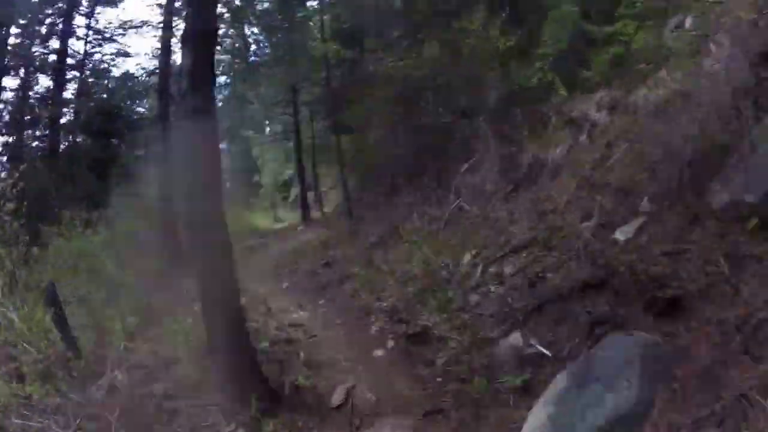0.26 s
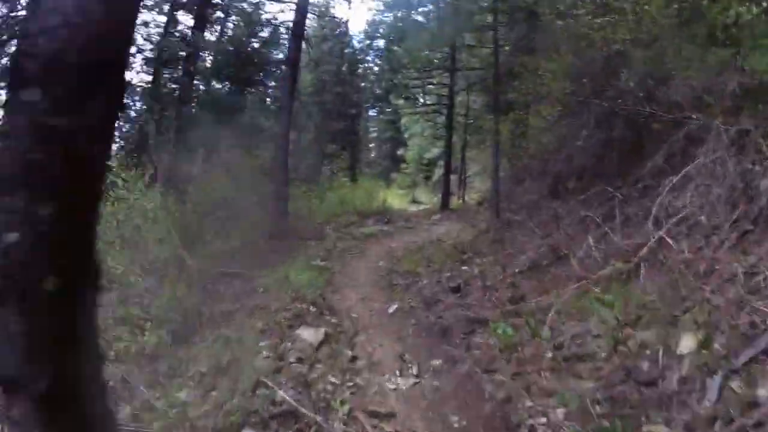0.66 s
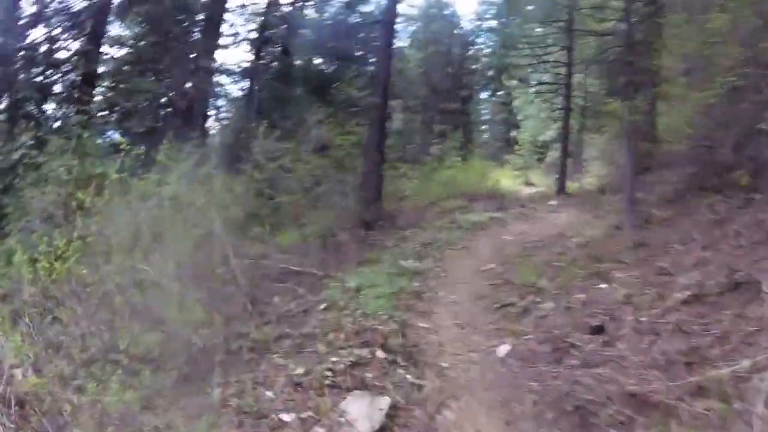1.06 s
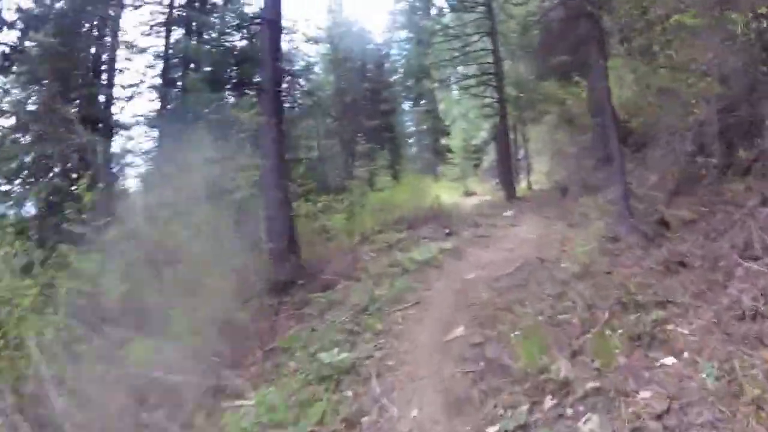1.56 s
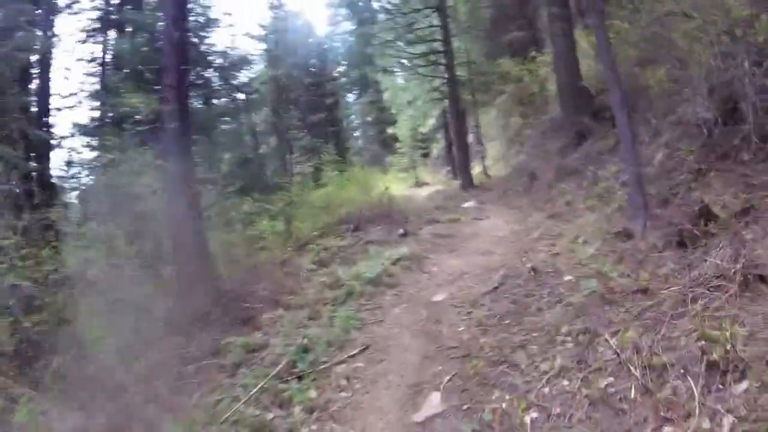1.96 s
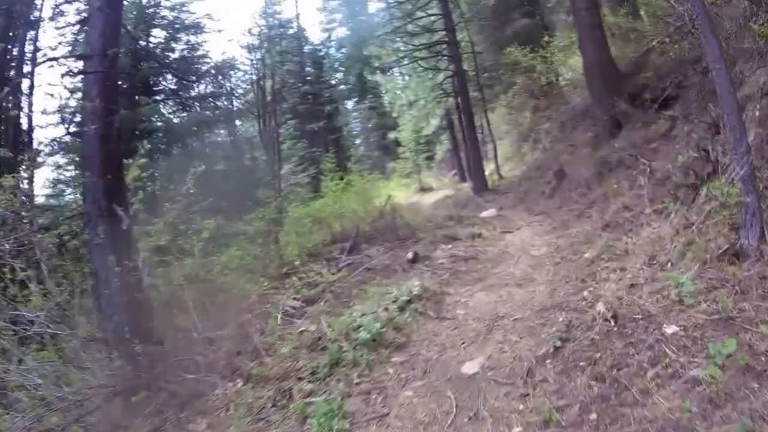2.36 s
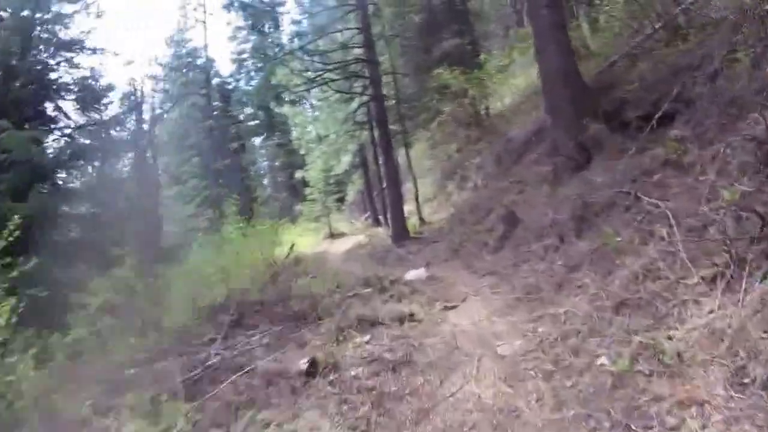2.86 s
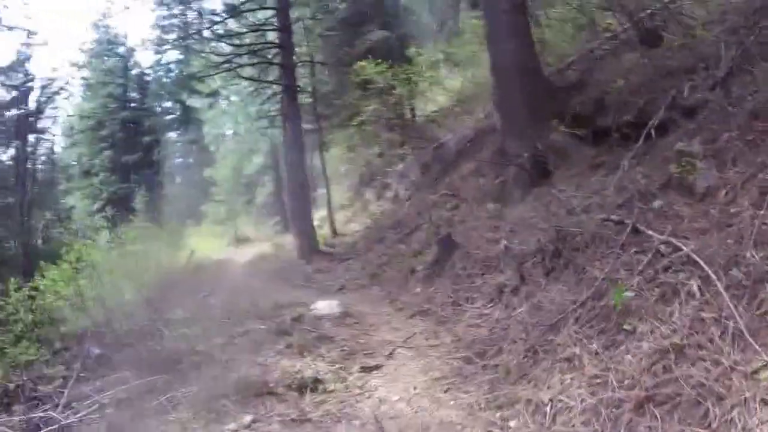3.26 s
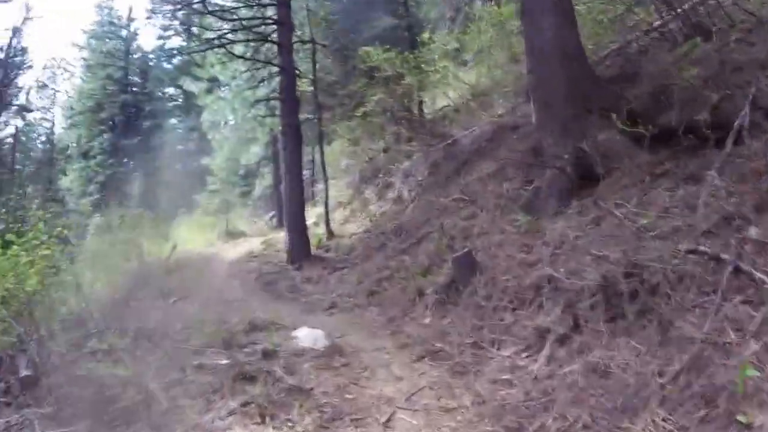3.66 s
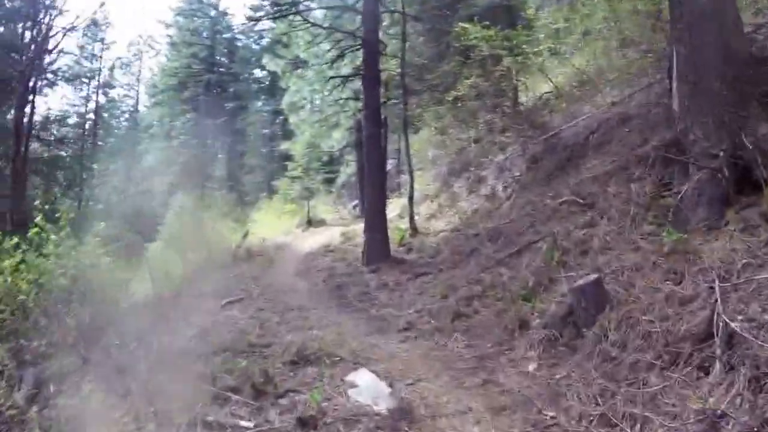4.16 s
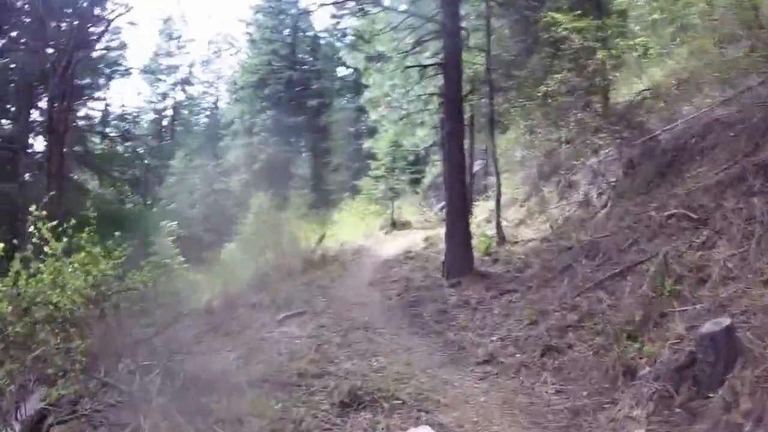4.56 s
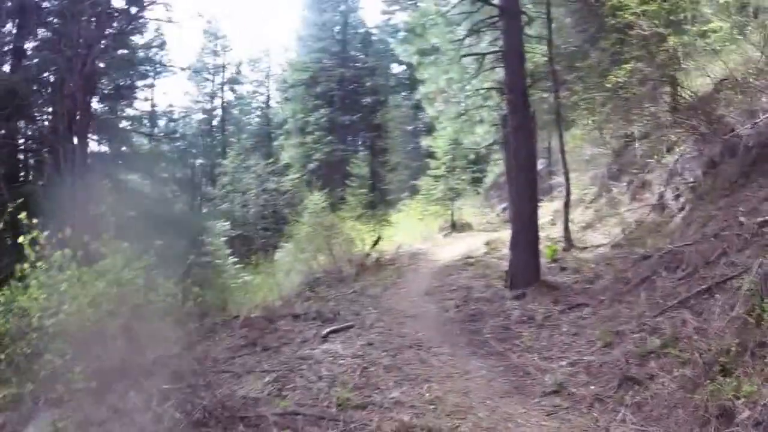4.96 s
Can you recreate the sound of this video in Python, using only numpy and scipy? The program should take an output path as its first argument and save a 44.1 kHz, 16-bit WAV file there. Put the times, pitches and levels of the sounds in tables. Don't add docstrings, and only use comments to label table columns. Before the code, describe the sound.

Boxy knocks, bright plastic rattles and gritty tyre chatter crowd together as a bike bounces fast downhill over rocks, roots and loose dirt.

```python
import sys
import numpy as np
from scipy import signal
from scipy.io import wavfile
from scipy.ndimage import uniform_filter1d

SR = 44100
rng = np.random.default_rng(int(sys.argv[2]) if len(sys.argv) > 2 else 0)


def generate_wav(sig):
    pcm = np.round(np.clip(np.atleast_2d(sig).T, -1, 1) * 32767).astype(np.int16)
    wavfile.write(sys.argv[1], SR, pcm)


def rack_gain(trim_db):
    fader = np.asarray(trim_db, float)
    return 10 ** (fader / 20)


N = 229653

# (frequency [Hz], width [Hz], level [dB])
HOLLOW_MODES = [(260, 59, -7), (358.4, 62, 0.5), (482.5, 54.8, 2), (604, 78, -7), (800, 66, -10)]
# (frequency [Hz], width [Hz], level [dB])
LID_MODES = [(642, 49, 0.12), (800, 152, -1.1)]
# (frequency [Hz], width [Hz], level [dB])
LOWER_WALL_MODES = [(834, 640, -7), (985, 540, 1), (1264, 122, 10), (1598, 153, 6)]
# (frequency [Hz], width [Hz], level [dB])
UPPER_WALL_MODES = [(2247, 135, 8.5), (2725, 111, 11), (3458, 224, 4), (4130, 270, -9.5)]
# (frequency [Hz], width [Hz], level [dB])
FRAME_MODES = [(83.5, 24, 0.5), (132.4, 21, -0.5), (196, 101, -11)]
# (frequency [Hz], width [Hz], level [dB])
VENT_MODES = [(3800, 360, 4), (4400, 280, 4.5), (4960, 310, -9), (5760, 350, -6), (6600, 500, -18.5),
              (7100, 400, -21), (9250, 500, -36)]

# (time [s], shake level [dB], stoniness [dB])
TRAIL = [(0.0, -15, -7), (0.09, -22.5, -8), (0.261, -22.5, -3.5), (0.93, -17.5, -2.5), (1.32, -18.5, -2.5),
         (1.87, -14.5, -6), (2.49, -19, -5.5), (2.69, -18.5, 0.5), (2.78, -18.5, -3), (3.481, -20.5, -3),
         (3.9, -18.5, 0), (4.2, -17.5, -1.5), (4.53, -17.5, -2), (5.2, -15.5, -2)]
# (middle [s], chatter change [dB], half length [s])
SKIDS = [(0.072, 10, 0.011), (0.169, -26, 0.023), (0.423, 9, 0.029), (0.618, 8, 0.025), (0.956, 7, 0.01),
         (1.027, 13, 0.037), (1.11, -6, 0.0047), (1.237, 5, 0.009), (1.607, -9, 0.013), (1.728, 6, 0.048),
         (1.915, -5, 0.036), (2.025, 8.5, 0.018), (2.372, 12.5, 0.041), (2.421, -14, 0.01),
         (2.656, 4.5, 0.011), (3.064, 4.5, 0.034), (3.104, 4, 0.15), (3.156, -13, 0.017), (3.22, 3, .015),
         (3.456, 8, 0.1), (3.49, 4, 0.023), (3.593, 9.5, 0.033), (3.809, -9, 0.032), (4.229, 9.5, 0.0093),
         (4.35, -5, 0.0089), (4.455, 6.5, 0.0042), (4.6, 4.5, 0.049), (4.712, -1, 0.02),
         (4.883, -10, 0.0058), (5.124, 7.5, 0.0072)]
# (time [s], peak level [dB], pitch [Hz])
JOLTS = [(0.03, -4, 382), (0.208, -5, 350), (0.226, -5.5, 426), (0.237, -8.5, 490), (0.72, 3, 421),
         (0.823, 3, 456), (0.95, -4, 340), (0.962, -5, 470), (1.368, 5, 408), (1.377, -1, 435),
         (1.695, -2, 355), (1.729, 3, 427), (1.749, -15, 470), (2.197, 2.5, 464), (2.349, -4, 576),
         (5.143, -3, 470), (2.587, 5, 408), (2.669, -5, 430), (2.775, -2, 494), (2.811, -2.5, 436),
         (5.191, 1.5, 447), (3.06, -5, 476), (3.312, -10, 380), (5.164, 2.5, 468), (3.841, -6, 503),
         (4.075, -4, 440), (4.258, -8, 440), (4.766, -3.5, 485), (4.895, -4, 506), (4.937, 1, 510),
         (0.0005, 0.5, 387)]
# (time [s], knock level [dB], rattle level [dB], pitch [Hz])
ROOTS = [(0.0065, -8.5, -27, 393), (0.083, -5.5, -19.5, 370), (0.227, -13, -30, 470), (0.441, -4, -15, 430),
         (0.554, -8, -34, 372), (0.629, -6, -21, 470), (1.132, 1, -12, 538), (1.283, -3.5, -13.5, 357),
         (1.321, 0.5, -16, 368), (1.455, -5.5, -19, 386), (2.048, -5, -9, 427), (2.125, -6, -18, 490),
         (2.558, -8.5, -29.5, 449), (2.588, -2.5, -16.5, 399), (2.668, -12.5, -28, 386),
         (2.877, -21, -57, 430), (3.089, -1.5, -37, 480), (3.182, -5.5, -24.5, 463),
         (3.566, -3.5, -14, 376), (1.551, -5.5, -28, 476), (4.038, -4.5, -19, 490),
         (4.075, -13.5, -17, 446), (4.323, 0.5, -17, 508), (4.388, -1.5, -16.5, 503),
         (4.432, -2.5, -12, 468), (4.65, -7, -21, 450), (4.726, -7, -15, 462), (5.036, -3.5, -10.5, 453),
         (5.155, 0, -14, 468), (5.184, 0.5, -16.5, 450)]
# (time [s], rattle level [dB], knock level [dB], tick level [dB], ring T60 [s])
ROCKS = [(.0175, -23, -5, -25.5, 0.016), (.306, -7, -16.5, -22.5, 0.015), (.496, -4.5, -5.5, -9, 0.059),
         (.72, -5.5, -9.5, -32, 0.026), (.762, -5.5, -4, -4, 0.06), (0.8179, 1, 0, -8.5, 0.065),
         (1.007, 4, 4.5, -10, 0.019), (1.021, 5.5, -11, -16.5, 0.17), (1.069, 3, -3, -6, 0.02),
         (1.364, -7, -16.5, -7, 0.044), (1.502, -1.5, -4.5, -4, 0.049), (1.566, -5.5, -3, -23, 0.053),
         (1.746, -4, -5.5, -7, 0.05), (1.89, -6.5, 1.5, -9, 0.058), (2.159, -12.5, -1.5, -16.5, 0.032),
         (2.355, 4, -8.5, -13, 0.033), (2.4651, -5.5, 1, -8.5, 0.066), (2.773, -1.5, -5.5, -9.5, 0.072),
         (3.368, 1, -5.5, -10.5, 0.039), (3.588, -3, -7.5, -6.5, 0.056), (3.7112, -2, -0.5, -20.5, 0.064),
         (4.212, -2.5, -5.5, -9, 0.041), (4.79, -10, -1.5, -10, 0.08), (4.897, 6, -26, -13, 0.05)]
# (time [s], rattle level [dB], knock level [dB], tick level [dB])
REBOUNDS = [(0.093, -7, -22, -22), (.314, -13, -12.5, -17), (0.782, -16.5, -14, -10.5),
            (.836, -2, -6, -20.5), (1, -13, -16.5, -9), (1.033, -11, -3, -25), (1.042, -11, -23, -18),
            (1.082, -14, -12, -14), (1.517, -13, -10, -18), (1.541, -11, -8.5, -31),
            (1.721, -4.5, -11, -17), (1.895, 1, 0, -15.5), (1.911, -14, -10, -12), (2.17, -5.5, -9, -37),
            (2.193, -1.5, -6.5, -14.5), (2.34, -4.5, -11, -5.5), (2.37, -13, -15.5, -31),
            (2.478, -4, -7, -13.5), (2.5, -9, -8, -18), (2.527, -4, -5, -13), (2.809, -4, -10, -23),
            (2.834, -4, -10, -13.5), (3.601, 0, -7, -16.5), (3.61, -2, -5, -28.5),
            (3.722, -11, -10.5, -13.5), (4.225, 2, -11, -8), (4.245, -22, -25, -29), (4.906, -26, -7, -28),
            (4.933, -3.5, -31, -17), (4.965, -3, -16, -9.5)]
# (time [s], rattle level [dB], knock level [dB], tick level [dB])
STONES = [(0.064, -15, -18, -23), (0.221, -18, -6, -15), (0.288, -9, -16.5, -17), (0.415, -23, -17, -17.5),
          (0.534, -12, -19, -20), (0.602, -13.5, -35, -20), (0.918, -27, -26, -12), (1.245, -20, -37, -16),
          (1.41, -4.5, -15, -36), (1.473, -17, -13, -11), (1.677, -10, -23, -21), (1.694, -6, -21, -28),
          (1.865, -3, -20, -23), (2.239, -15, -19, -28), (2.282, -16, -19, -12.5), (2.516, -9, -15, -22),
          (2.744, -3.5, -7.5, -9), (2.895, -6.5, -14.5, -9.5), (2.933, -8, -27, -19.5),
          (3.121, -15, -12.5, -22), (3.143, -17, -37, -13.5), (3.25, -9, -10, -13), (3.272, -5, -10, -12),
          (3.689, -1, -8, -11), (3.896, -10.5, -11.5, -16.5), (4.128, -2, -11.5, -13),
          (4.285, -6, -18, -19.5), (4.46, -1, -22, -16), (4.992, -7, -8.5, -10.5), (5.076, -2.5, -6, -13.5)]
# (time [s], rattle level [dB], knock level [dB], tick level [dB])
PEBBLES = [(0.172, -23, -22.5, -33), (0.483, -24, -27, -34), (0.544, -7, -12.5, -20),
           (0.702, -12.5, -15, -27), (1.172, -35, -13.5, -42), (1.334, -8.5, -11.5, -10.5),
           (1.647, -17, -30, -21), (1.803, -26, -25, -20), (1.848, -17, -15, -22), (2.025, -25, -32, -21),
           (2.081, -28, -33, -27), (2.221, -14, -19, -17), (2.413, -25, -24, -21), (2.653, -15.5, -30, -25),
           (2.962, -16, -23, -12.5), (3.097, -11.5, -14, -27), (3.281, -29, -21, -22),
           (3.339, -23, -14.5, -25), (3.503, -25, -16, -18), (3.551, -11.5, -24, -12.5),
           (3.665, -18, -29, -32), (3.746, -11, -19, -18.5), (3.783, -11, -13, -15),
           (3.844, -9.5, -32, -28), (3.872, -11.5, -28, -15.5), (3.945, -15, -14.5, -22),
           (3.986, -28, -13.5, -29), (4.177, -8.5, -14, -20), (4.406, -5.5, -14, -26),
           (4.519, -20, -18, -26)]
# (middle [s], peak level [dB], pitch [Hz], half length [cycles])
THUDS = [(.012, -14.5, 89, 2.3), (0.0886, 5, 190, 0.24), (0.099, 6, 200, 0.3), (0.112, -5.5, 89.3, 2.3),
         (0.125, -10, 90, 0.72), (0.307, 13.5, 204, 0.32), (0.343, 3.5, 111, 0.18),
         (1.022, -22.5, 136, 3.6), (1.336, -9, 90, 0.56), (1.902, -2.5, 260, 0.52), (3.502, -10.5, 129, 2),
         (0.489, -13.5, 82.6, 1.8), (3.99, -19, 77, 3.5), (4.911, -2, 201, 0.21)]
# (time [s], peak level [dB], frequency [Hz])
SNAPS = [(0.055, -30.5, 3920), (0.061, -27, 3780), (0.085, -31, 4020), (0.171, -32, 3880),
         (0.418, -27, 4000), (0.793, -29, 3800), (0.916, -42, 3820), (4.214, -23, 4800), (1.002, -32, 3860),
         (1.084, -23, 3820), (1.231, -31, 3800), (1.243, -25.5, 4270), (1.283, -27.5, 3950),
         (1.335, -28, 4000), (1.568, -26.5, 3800), (1.75, -22, 4130), (1.906, -15.5, 3980),
         (2.044, -23, 3800), (2.152, -27, 3900), (2.172, -33, 4020), (2.467, -19, 3800), (2.516, -23, 3940),
         (3.139, -26, 3930), (3.462, -26, 3820), (3.506, -20.5, 3850), (3.55, -22, 3800),
         (3.592, -20, 4110), (3.725, -26, 3810), (0.4975, -25, 4800), (3.901, -33, 3800),
         (4.244, -22, 3860), (4.461, -28, 5200)]
# (time [s], peak level [dB], panel frequency [Hz])
CHIPS = [(0.101, -14, 1920), (0.528, -6, 2190), (0.624, -9, 2200), (0.656, -12, 2150), (0.807, -22, 2630),
         (0.835, -6, 2380), (1.025, -4, 1970), (1.147, -13, 2140), (1.162, -13, 2720), (1.9125, -2, 3020),
         (1.307, -7.5, 2790), (1.452, -5.5, 2680), (1.494, -22.5, 2710), (4.894, -10, 2240),
         (1.568, -13, 2180), (1.729, -7, 2700), (1.905, 0, 3270), (1.964, -17, 2700), (1.971, -14, 2690),
         (2.121, -16, 2330), (2.133, -12, 2640), (2.159, -2, 2340), (2.328, -14, 2730), (2.358, -3, 1730),
         (2.55, -12, 2650), (2.715, -18, 2730), (2.912, -12, 2730), (5.072, -6, 2580), (3.121, -10, 2310),
         (3.264, -13, 2700), (3.271, -4, 2260), (3.337, -13, 2620), (3.399, -8, 2630), (3.421, -9, 2710),
         (3.566, 0, 2710), (3.589, 3, 2610), (3.634, -24, 2700), (3.794, -11, 2650), (3.841, -9, 2680),
         (3.914, -12, 2690), (3.953, -13, 2060), (4.026, -7, 1810), (4.049, -11, 1810), (4.151, -16, 2710),
         (4.257, -6, 2740), (4.321, -9, 2660), (4.332, -19, 2660), (4.343, -14, 2700), (4.379, -11.5, 2730),
         (1.7505, 1, 3200), (4.531, -5, 2610), (4.59, -8, 1850), (4.618, -14, 2750), (4.633, -10.5, 2320),
         (4.692, -22, 2720), (4.765, -10, 2620), (4.783, -20, 1810), (5.021, -13, 2310), (5.116, -8, 2300),
         (5.183, -13, 2800)]
# (time [s], peak level [dB], panel frequency [Hz])
GRAVEL = [(0.22, -12, 1420), (0.291, -7, 1250), (0.36, -18, 1090), (0.414, -21, 1330), (0.53, -6.5, 1500),
          (0.608, -12, 1550), (0.661, -12, 800), (0.992, -7, 1600), (1.081, -2, 664), (1.174, -10.5, 654),
          (1.452, -6, 700), (1.473, -16, 636), (1.517, -2, 1250), (1.622, -16.5, 1360), (1.745, -1, 640),
          (1.833, -19, 1330), (1.91, -11, 635), (1.965, -8, 740), (1.984, -9, 670), (2.16, 1, 1240),
          (2.222, -15, 1660), (2.244, -9.5, 1360), (2.284, -5.5, 1240), (2.348, 1, 660), (2.377, -6, 1330),
          (2.397, -22, 1310), (2.413, -7, 760), (2.458, -11, 1340), (2.499, -8, 1310), (2.547, -16, 1260),
          (2.587, -4.5, 743), (2.746, 1, 1280), (2.967, -5.5, 1550), (3.045, -28, 660), (3.064, -15, 1300),
          (3.086, -10.5, 910), (3.132, -7.5, 1250), (3.143, -11, 1680), (3.178, -7.5, 854),
          (3.25, -2, 1545), (3.285, -27, 654), (3.37, 2.5, 1254), (3.401, -10, 1300), (3.415, -22, 1320),
          (3.592, 5, 800), (3.635, -7, 654), (4.001, -14.5, 670), (4.018, -14, 820), (4.03, -10.5, 640),
          (4.05, -10, 1320), (4.213, 2.5, 1540), (4.259, -9.5, 1520), (4.552, -9.5, 1465),
          (4.587, -16, 820), (4.698, -11.5, 1340), (4.767, -7, 1520), (4.783, -10.5, 1260),
          (5.022, -8.5, 1260), (5.066, -7, 800), (5.099, -1.5, 790)]

LANDING_SAG_HZ = 111
KNOCK_HZ, SETTLE_S, KNOCK_SPREAD = 457, 0.81, 0.017
ROCK_HZ, ROCK_SETTLE_S, ROCK_SPREAD = 468, 0.3, 0.018
KNOCK_T60_S, T60_SPREAD, REBOUND_T60_SHARE = 0.038, 0.3, 0.89
KNOCK_LAG_S = 0.00154
COLOUR_HZ, COLOUR_OCT_PER_DB, COLOUR_SPREAD = 968, -0.0639, 0.23
CONTACT_S, CONTACT_PER_T60, CONTACT_SPREAD = 0.0064, 0.13, 0.54
KNOCK_DB, RATTLE_DB, TICK_DB = 4.5, 1.5, 5


def ring(x, modes):
    total = 0
    for k, (hz, width, db) in enumerate(modes):
        b, a = signal.iirpeak(hz, hz / width, fs=SR)
        total = total + (-1) ** k * rack_gain(db) * signal.lfilter(b, a, x)
    return total


def unit(x):
    return x / np.sqrt(np.mean(x ** 2))


def butter(x, order, hz, kind="low"):
    return signal.sosfilt(signal.butter(order, hz, kind, fs=SR, output="sos"), x)


def place(times, shapes, peak_db):
    out = np.zeros(N + shapes.shape[1])
    for s, shape, db in zip(times, shapes, peak_db):
        i = int(s * SR)
        out[i:i + len(shape)] += shape * rack_gain(db) / np.abs(shape).max()
    return out[:N]


def grit(rate, spread_db, smear_s):
    struck = rng.random(N) < rate / SR
    sizes = struck * rack_gain(spread_db * np.minimum(rng.exponential(size=N), 3))
    fade = np.exp(-1 / (smear_s * SR))
    return unit(signal.lfilter([1], [1, -fade], sizes) * rng.standard_normal(N))


def scrape_in(hits, rise_s):
    return hits * (1 - np.exp(-np.arange(hits.shape[1]) / (rise_s * SR)))


def contacts(count, decay_s):
    t = np.arange(int(0.08 * SR)) / SR
    bursts = scrape_in(rng.standard_normal((count, len(t))), 0.0007)
    return bursts * np.exp(-t / decay_s)


def swing(hz, t60, rise_s):
    t = np.arange(int(0.2 * SR)) / SR
    phase = 2 * np.pi * (np.outer(hz, t) + rng.random((len(hz), 1)))
    fade = np.exp(-np.log(1000) * np.outer(1.246 / t60, t) ** 1.12)
    return (1 - np.exp(-t / rise_s)) * fade * np.sin(phase)


def chatter():
    t = np.arange(N) / SR
    s, shake_db, stoniness_db = np.transpose(TRAIL)
    hollow_db = np.interp(t, s, shake_db)
    stony_db = np.interp(t, s, stoniness_db)
    skid_db = sum(db * np.exp(-((t - mid) / half) ** 2) for mid, db, half in SKIDS)
    walls_db = hollow_db - 6.5 + stony_db + skid_db
    vent_db = hollow_db - 30.5 + 1.2 * stony_db + skid_db
    hollow_db = hollow_db + 0.6 * skid_db
    frame_db = -23.5 - 1.26 * t + 17.5 * np.exp(-t / 0.18)

    coarse = grit(300, spread_db=-4.0, smear_s=0.013)
    fine = grit(500, spread_db=2.5, smear_s=0.0044)
    hollow = unit(ring(coarse + 0.38 * fine, HOLLOW_MODES))
    lower = ring(fine + 0.45 * coarse, LOWER_WALL_MODES)
    upper = ring(fine + 0.23 * coarse, UPPER_WALL_MODES)
    walls = unit(lower + rack_gain(-5.0) * upper)
    frame = unit(ring(ring(rng.standard_normal(N), FRAME_MODES), [(118, 1200, 0)]))
    crunch = ring(grit(730, spread_db=6.5, smear_s=0.0025) + 0.43 * fine, VENT_MODES)
    crunch = unit(butter(crunch, 4, [3300, 9800], "band"))
    shake = rack_gain(hollow_db) * hollow + rack_gain(walls_db) * walls + rack_gain(frame_db) * frame
    return shake, rack_gain(vent_db) * crunch


def faint_hiss(shape):
    swells = unit(uniform_filter1d(rng.standard_normal(N), int(0.05 * SR)))
    return rack_gain(-93 + 4.5 * swells) * rng.standard_normal(shape)


def jolts():
    s, db, hz = np.transpose(JOLTS)
    return place(s, swing(hz, np.full(len(s), 0.035), rise_s=0.0028), db - 4.0)


def blows():
    rocks, roots = np.array(ROCKS), np.array(ROOTS)
    small = np.vstack([REBOUNDS, STONES, PEBBLES])
    root_s, root_knock_db, root_rattle_db, root_hz = roots.T
    dull = np.c_[root_s, root_rattle_db + TICK_DB, root_knock_db - KNOCK_DB, root_rattle_db]
    s, rattle_db, knock_db, tick_db = np.r_[rocks[:, :4], small, dull].T

    pitch_luck, t60_luck, contact_luck, colour_luck = rng.standard_normal((4, len(s)))
    hz = (KNOCK_HZ - LANDING_SAG_HZ * np.exp(-s / SETTLE_S)) * np.exp(KNOCK_SPREAD * pitch_luck)
    firm_hz = (ROCK_HZ - LANDING_SAG_HZ * np.exp(-s / ROCK_SETTLE_S)) * np.exp(ROCK_SPREAD * pitch_luck)
    rocks_end = len(rocks)
    rebounds_end = rocks_end + len(REBOUNDS)
    hz[:rebounds_end] = firm_hz[:rebounds_end]
    hz[-len(roots):] = root_hz

    t60 = KNOCK_T60_S * np.exp(T60_SPREAD * t60_luck)
    t60[:rocks_end] = rocks[:, 4]
    t60[rocks_end:rebounds_end] *= REBOUND_T60_SHARE
    contact_s = CONTACT_S * np.exp(CONTACT_SPREAD * contact_luck)
    contact_s[:rocks_end] = CONTACT_PER_T60 * rocks[:, 4]
    colour_hz = COLOUR_HZ * 2 ** (COLOUR_OCT_PER_DB * rattle_db + COLOUR_SPREAD * colour_luck)
    return s, rattle_db + RATTLE_DB, knock_db + KNOCK_DB, tick_db + TICK_DB, hz, t60, colour_hz, contact_s


def knocks(s, db, hz, t60):
    t60 = np.clip(t60, 0.015, 0.2)
    main = place(s, swing(hz, t60, rise_s=0.073 * t60[:, None]), db)
    blow = contacts(len(s), 0.14 * t60[:, None])
    neighbours = place(s, ring(blow, HOLLOW_MODES), db)
    lid = place(s, ring(blow, LID_MODES), -6 + 1.86 * db)
    return main + neighbours + lid


def rattles(s, db, hz, contact_s):
    hits = contacts(len(s), np.clip(contact_s, 0.001, 0.015)[:, None])
    hits = scrape_in(hits, 0.087 * contact_s[:, None])
    near = 0
    for mode in LOWER_WALL_MODES:
        octaves_off = np.abs(np.log2(hz / mode[0]))
        near = near + ring(hits, [mode]) * rack_gain(-25 * octaves_off)[:, None]
    return place(s, near + rack_gain(-38.5) * ring(hits, UPPER_WALL_MODES), db)


def ticks(s, db):
    hits = scrape_in(contacts(len(s), decay_s=0.0029), 0.00089)
    return place(np.maximum(s - 0.001012, 0), ring(hits, UPPER_WALL_MODES), db)


def thuds():
    s, db, hz, cycles = np.transpose(THUDS)
    half_s = 0.04
    turns = np.outer(hz, np.arange(-half_s, half_s, 1 / SR))
    pushes = np.cos(2 * np.pi * turns) * np.exp(-(turns / cycles[:, None]) ** 2)
    return place(np.maximum(s - half_s, 0), pushes, db)


def flung_stones(table, width_share, gain_db, rise_s, fade_s, body_db, body):
    s, db, hz = np.transpose(table)
    uneven_fade_s = fade_s * np.exp(0.32 * rng.standard_normal((len(s), 1)))
    hits = scrape_in(contacts(len(s), uneven_fade_s), rise_s)
    own = np.array([ring(hit, [(f, width_share * f, 0)]) for hit, f in zip(hits, hz)])
    return place(np.maximum(s - rise_s, 0), own + rack_gain(body_db) * ring(hits, body), db + gain_db)


def vent_snaps():
    snaps = flung_stones(SNAPS, 0.19, gain_db=5.5, rise_s=0.001, fade_s=0.002, body_db=-9.5, body=VENT_MODES)
    return butter(snaps, 4, 5000)


def wall_chips():
    return flung_stones(CHIPS, 0.066, gain_db=-3.5, rise_s=0.001487, fade_s=0.004,
                        body_db=-22.5, body=UPPER_WALL_MODES)


def wall_gravel():
    return flung_stones(GRAVEL, 0.09, gain_db=-0.5, rise_s=0.001533, fade_s=0.0029,
                        body_db=-22.0, body=LOWER_WALL_MODES)


def through_seal(inside):
    dulled = butter(inside, 3, 3410)
    shelf = signal.cheby1(8, 1, 4750, fs=SR, output="sos")
    return 0.61 * signal.sosfiltfilt(shelf, dulled) + rack_gain(-12.0) * dulled


def scene():
    shake, crunch = chatter()
    s, rattle_db, knock_db, tick_db, hz, t60, colour_hz, contact_s = blows()
    inside = shake + jolts() + thuds() + wall_chips() + wall_gravel()
    inside += knocks(s + KNOCK_LAG_S, knock_db, hz, t60)
    inside += rattles(s, rattle_db, colour_hz, contact_s)
    inside += ticks(s, tick_db)
    at_microphone = through_seal(inside) + crunch + vent_snaps()
    return butter(at_microphone, 3, 54.7, "high")[None]


def roll_off(x):
    return signal.sosfilt(signal.butter(12, 15800, fs=SR, output="sos"), x)


def record(dry):
    knee, ceiling, sag_hz, soften_hz = 19, 0.94, 64, 4530
    flat = ceiling * dry / (1 + np.abs(dry) ** knee) ** (1 / knee)
    b, a = signal.butter(1, [sag_hz, soften_hz], "band", fs=SR)
    mix = signal.lfilter(b, a, flat) + faint_hiss(dry.shape)
    return roll_off(np.clip(mix, -0.99, 0.99))


dry = scene()
out = record(dry)
generate_wav(out)
```